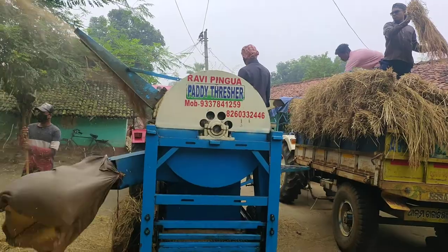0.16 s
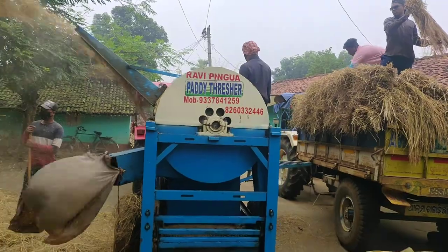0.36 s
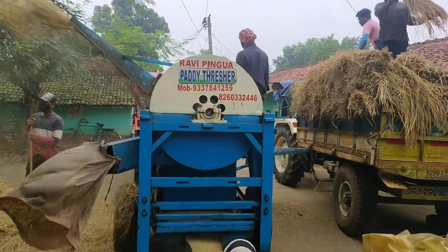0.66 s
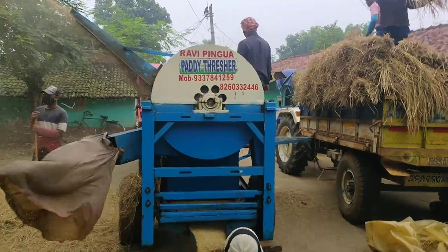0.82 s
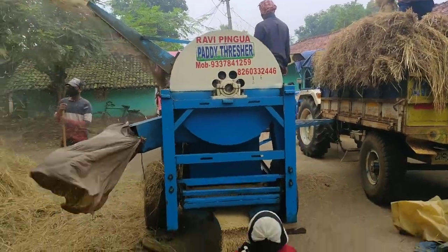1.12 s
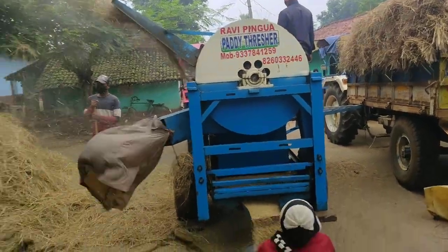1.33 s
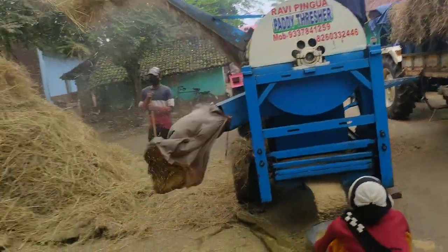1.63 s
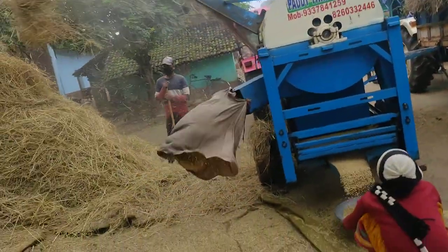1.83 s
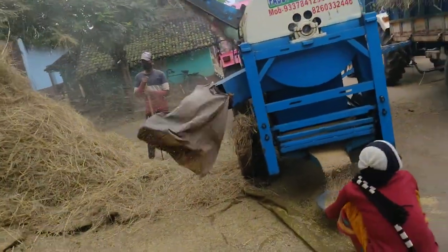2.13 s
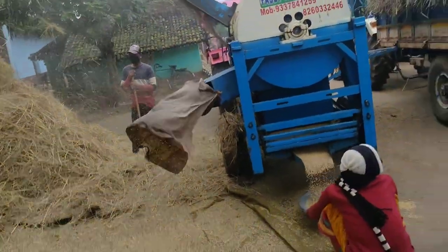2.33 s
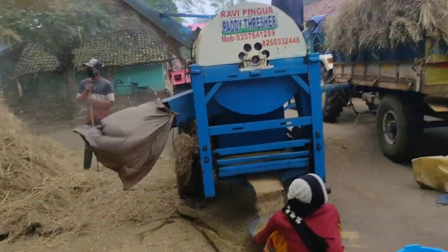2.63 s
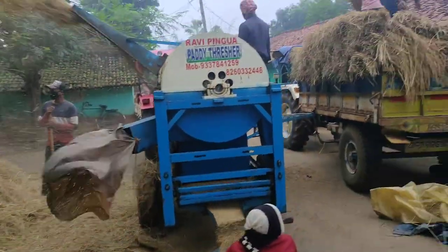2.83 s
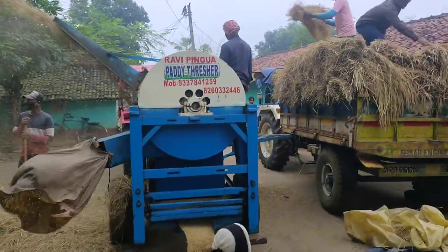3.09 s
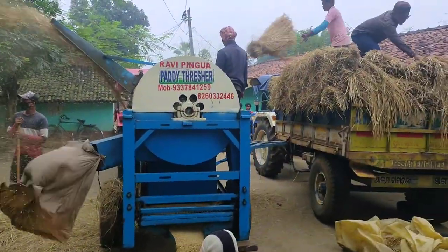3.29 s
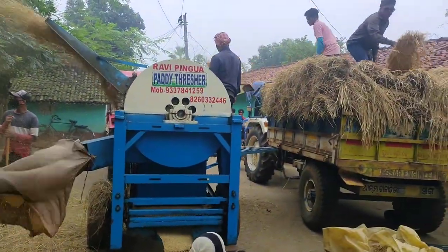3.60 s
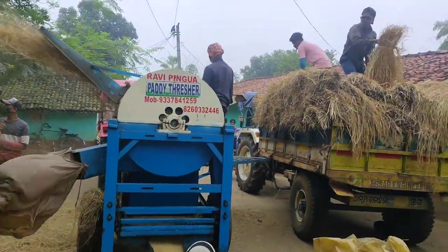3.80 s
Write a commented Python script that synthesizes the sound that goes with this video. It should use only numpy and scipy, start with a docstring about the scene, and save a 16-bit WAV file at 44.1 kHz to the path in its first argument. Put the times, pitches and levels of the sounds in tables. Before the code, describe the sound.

A paddy threshing machine runs steadily, dense straw hiss over low drum booms and dull knocks

```python
"""A dense hiss of straw and grain, its colour always shifting, over booms and knocks: a paddy thresher
runs steadily a few metres away in a village yard. Straw, grain and blower air are shaped noise with
moving levels; wads of straw boom as narrow-band noise and blows knock as short damped tones in the
sheet-metal drum housing; engine and drum shaft hum as harmonics of their turning rates."""
import sys
import numpy as np
from scipy import signal
from scipy.fft import rfft, irfft
from scipy.io import wavfile
from scipy.ndimage import uniform_filter1d

SR = 44100
rng = np.random.default_rng(int(sys.argv[2]) if len(sys.argv) > 2 else 0)


def waveform_to_disk(signal):
    """Save audio, clipped to [-1, 1], as 16-bit WAV at the path in sys.argv[1]."""
    frames = np.transpose(np.atleast_2d(signal))
    scaled = np.clip(frames, -1, 1) * 32767
    samples = np.round(scaled).astype(np.int16)
    wavfile.write(sys.argv[1], SR, samples)


N = 174195
T = np.arange(N) / SR
HOP = 256  # samples


def amp(db):
    """Decibels to gain."""
    return 10 ** (np.asarray(db) / 20)


def unit(x):
    """Scales to rms 1."""
    return x / np.sqrt(np.mean(x ** 2) + 1e-20)


def curve(points, t, column=1):
    """One column of a time table, interpolated at t."""
    p = np.transpose(points)
    return np.interp(t, p[0], p[column])


def read_spectrum(points, hz, column=1):
    """One column of a spectrum table, interpolated on a log-frequency axis."""
    p = np.transpose(points)
    return np.interp(np.log(hz + 1), np.log(p[0] + 1), p[column])


def add(mix, start_s, sound):
    """Mixes a sound in at a time."""
    part = mix[max(round(start_s * SR), 0):][:len(sound)]
    part += sound[:len(part)]


def drift(rate_hz):
    """Low-passed Gaussian noise of rms 1; its spectrum falls to 1/e at rate_hz."""
    f = np.fft.rfftfreq(N, 1 / SR)
    return unit(irfft(rfft(rng.standard_normal(N)) * np.exp(-(f / rate_hz) ** 2), N))


def recolour(x, gain, size=1024):
    """A moving filter, given as a gain of frequency and time."""
    hz, t, z = signal.stft(x, SR, nperseg=size, noverlap=size - HOP)
    return signal.istft(z * gain(hz[:, None], t), SR, nperseg=size, noverlap=size - HOP)[1][:, :N]


# likeness of the two channels: (frequency [Hz], share [0-1])
CHANNEL_LIKENESS = [(100, 0.97), (330, 0.9), (520, 1), (820, 0.72), (1050, 0.48), (1300, 0), (2300, 0.17),
                    (3000, 0.04), (15000, 0.01)]


def turbulence(spectrum, level, patch_db, patch_s, patch_hz, size=1024, shift=((0, 1), (1, 1))):
    """Two-channel turbulent noise: a spectrum, a level curve and random passing patches of colour."""
    frames, hz = N // HOP + 10, np.fft.rfftfreq(size, 1 / SR)
    white = rng.standard_normal((2, frames * HOP))
    a, b = signal.stft(white, nperseg=size, noverlap=size - HOP)[2].transpose(0, 2, 1)

    # patches: random field smoothed over time and frequency
    time_blur = (np.fft.fftfreq(len(a), HOP / SR)[:, None] * patch_s) ** 2
    freq_blur = (np.fft.fftfreq(len(hz), SR / size) * patch_hz) ** 2
    field = np.fft.fft2(rng.standard_normal(a.shape))
    patches = unit(np.fft.ifft2(field * np.exp(-time_blur - freq_blur)).real)

    same = np.clip(read_spectrum(CHANNEL_LIKENESS, hz), 0, 1)
    right_noise = same * a + np.sqrt(1 - same ** 2) * b
    hz = hz / curve(shift, np.arange(len(a)) * HOP / SR)[:, None]  # ratio > 1 moves the spectrum up
    left = a * amp(read_spectrum(spectrum, hz))
    right = right_noise * amp(read_spectrum(spectrum, hz, column=2))
    z = np.array([left, right]) * unit(amp(patch_db * patches))
    noise = signal.istft(z.transpose(0, 2, 1), nperseg=size, noverlap=size - HOP)[1][:, :N]
    return noise * np.sqrt(SR / 2) * amp(curve(level, T))


# hum lines: (multiple of turning rate [-], level [dB], slow waver [dB rms])
ENGINE_LINES = [(1, -55.5, .6), (2, -49, 0.23), (3, -60.5, 1.6)]
SHAFT_LINES = [(1, -59, 1.5), (2, -47.5, 1.8), (3, -59, 3)]
ENGINE_HZ, SHAFT_HZ = 44.23, 33.96
ENGINE_SLIP, SHAFT_SLIP = 0.0027, 0.0047  # rms fraction of speed


def hum(hz, lines, slip):
    """Harmonics of a turning part whose speed slips a little."""
    turns = np.cumsum(hz * (1 + slip * drift(0.72))) / SR
    total = np.zeros(N)
    for multiple, db, waver_db in lines:
        level = np.sqrt(2) * amp(db + waver_db * drift(4.9))
        total += level * np.sin(2 * np.pi * (round(multiple) * turns + rng.random()))
    return total


WHIR_RATE_HZ = 51


def whir(length_s, db, first_hz, last_hz):
    """A narrow band of wind noise that swells, glides and fades."""
    n = round(length_s * SR)
    turn = 2 * np.pi * np.cumsum(np.linspace(first_hz, last_hz, n)) / SR
    noise = drift(WHIR_RATE_HZ)[:n] * np.cos(turn) + drift(WHIR_RATE_HZ)[:n] * np.sin(turn)
    return amp(db) * unit(noise * np.sin(np.linspace(0, np.pi, n)))


# spectra before level: (frequency [Hz], left [dB per Hz], right [dB per Hz])
ROAR_SPECTRUM = [(353, -83, -93), (504, -87.5, -74), (665, -70, -61), (724, -68, -64.5), (884, -66, -70),
                 (1004, -66, -73), (1000, -77, -83.5), (1235, -100, -74), (2520, -120, -120)]
UPPER_ROAR_SPECTRUM = [(854, -94, -101), (995, -65.5, -78), (1134, -70.5, -69.5), (1450, -68.5, -70.5),
                       (1583, -66.5, -71), (1810, -71.5, -78), (2420, -77.5, -79), (3000, -125, -125)]
# gains: (time [s], level [dB])
ROAR_LEVEL_DB = [(0, 5.5), (.2, 7.5), (.33, 0.5), (.48, 7), (.64, -2), (.73, 7), (.86, -2.5), (1.05, -0.5),
                 (1.14, 3), (1.68, 0.5), (1.76, -9.5), (1.82, 8), (1.89, -7.5), (1.96, 3), (2.18, -5),
                 (2.301, 1.5), (2.76, -3), (2.83, 4), (3.25, 2), (3.5, -0.5), (3.78, 0.5), (3.9, 6)]
UPPER_ROAR_LEVEL_DB = [(0, 1), (.2, 1.5), (.55, -1.5), (.75, -3.5), (.95, 0), (1.25, 0), (1.7, -3.5),
                       (1.85, 1.5), (2.15, -1.5), (2.25, 4), (2.45, 5), (2.75, -4), (2.85, 0), (3.05, -4),
                       (3.2, 0.5), (3.35, -2.5), (3.65, -2.5), (3.8, 5), (3.95, 2.5)]
# slide of the roar spectrum: (time [s], frequency ratio [-])
ROAR_SHIFT_RATIO = [(0, 1.106), (.5, 1.12), (1.4, 1.02), (1.8, 0.97), (2.7, 0.91), (3.1, 0.99),
                    (3.95, 0.92)]
# gliding whirs, before pan: (start [s], length [s], level [dB rms], first pitch [Hz], last pitch [Hz])
WHIR_EVENTS = [(.15, 0.083, -33, 839, 870), (1.07, 0.2, -40.5, 750, 795), (1.197, 0.14, -42.5, 860, 954),
               (1.41, 0.097, -46, 1008, 954), (1.52, 0.22, -44, 760, 736), (2.259, 0.15, -41, 529, 590),
               (2.32, 0.16, -43, 1178, 988), (2.54, 0.16, -39.5, 629, 682), (2.8, 0.0715, -39, 871, 750),
               (3.359, 0.057, -46, 730, 723), (3.569, 0.061, -43, 765, 723),
               (3.631, 0.14, -45.5, 860, 1040)]


def blower():
    """Gusty mid-range roar of the fan, with narrow passing whirs."""
    whirs = np.zeros(N)
    for start_s, *event in WHIR_EVENTS:
        add(whirs, start_s, whir(*event))
    roar = turbulence(ROAR_SPECTRUM, ROAR_LEVEL_DB, patch_db=2.5, patch_s=0.051, patch_hz=160,
                      size=2048, shift=ROAR_SHIFT_RATIO)
    upper_roar = turbulence(UPPER_ROAR_SPECTRUM, UPPER_ROAR_LEVEL_DB, patch_db=3.5, patch_s=0.093,
                            patch_hz=168, size=2048)
    return roar + upper_roar + whirs * amp([[-1], [-2]])


WAD_RISE_S, WAD_FALL_S, WAD_HALF_WIDTH_HZ = 0.0044, 0.027, 71.4


def wad(length_s, db, hz):
    """Beaters drag a wad of straw round: the housing booms at an even strength and an unsteady pitch."""
    t = np.arange(0, length_s + WAD_FALL_S, 1 / SR)
    f = np.fft.rfftfreq(N, 1 / SR)
    band = 1 / (1 + ((f - hz) / WAD_HALF_WIDTH_HZ) ** 4)
    boom = signal.hilbert(unit(irfft(rfft(rng.standard_normal(N)) * band, N)))[:len(t)]
    even_boom = boom.real / np.hypot(abs(boom), 1)  # compresses the noise envelope
    envelope = np.clip(np.minimum(t / WAD_RISE_S, (t[-1] - t) / WAD_FALL_S), 0, 1)
    return amp(db) * unit(even_boom) * envelope


KNOCK_RISE_S = 0.0049


def knock(db, hz):
    """One dull blow: the damped housing swings for a few cycles."""
    t = np.arange(0, .06, 1 / SR)
    u = t / KNOCK_RISE_S
    envelope = u ** 2 * np.exp(2 * (1 - u))  # peaks at 1
    return amp(db) * envelope * np.sin(2 * np.pi * (hz * t + rng.random()))


# wads of straw, before envelope and pan: (start [s], length before fall [s], level [dB rms], pitch [Hz])
WAD_EVENTS = [(0.046, 0.051, -25, 246), (0.039, 0.052, -36, 454), (0.128, 0.043, -24.5, 278),
              (0.18, 0.053, -35, 330), (0.225, 0.033, -26, 316), (0.31, 0.054, -29, 258),
              (0.404, 0.061, -34.5, 370), (0.454, 0.14, -34.5, 256), (0.681, 0.034, -31.5, 294),
              (.865, 0.066, -37, 225), (0.886, 0.042, -33.5, 390), (1.019, 0.041, -35, 300),
              (1.498, 0.13, -40.5, 338), (1.739, 0.054, -35.5, 228), (1.863, 0.029, -34.5, 259),
              (2.068, 0.038, -34.5, 270), (2.191, 0.069, -36.5, 335), (2.324, 0.054, -32.5, 270),
              (3.005, 0.11, -34.5, 300), (3.305, 0.024, -36, 330), (3.728, 0.016, -30.5, 245),
              (3.767, 0.044, -28.5, 209)]
# single knocks, before pan: (start [s], envelope peak [dB], pitch [Hz])
KNOCK_EVENTS = [(0.076, -24, 242), (0.497, -22.5, 270), (0.743, -24, 231), (1.043, -25, 272),
                (1.354, -24.5, 295), (1.392, -25, 281), (1.584, -25, 290), (1.603, -30, 290),
                (1.908, -25.5, 304), (2.046, -23.5, 255), (2.063, -22.5, 260), (2.189, -24.5, 289),
                (2.368, -23, 279), (2.871, -29, 290), (3.057, -23, 284), (3.266, -20.5, 240),
                (3.589, -24.5, 243)]
# drum rumble before level: (frequency [Hz], left [dB per Hz], right [dB per Hz])
RUMBLE_SPECTRUM = [(22, -95, -90), (34, -91, -84), (74.4, -74, -73), (119, -87, -91), (171.5, -74, -77),
                   (204, -64, -63), (232, -71, -75), (307, -60, -60.5), (412, -72, -77), (458, -83.5, -87),
                   (710, -104, -100), (1500, -125, -125)]
# rumble gain: (time [s], level [dB])
RUMBLE_LEVEL_DB = [(0, 7.5), (.3, 6.5), (.7, 7.5), (1.2, 0), (1.45, 3.5), (1.7, 0.5), (2.25, 4), (2.5, -1),
                   (2.85, 3.5), (3.2, 0), (3.5, 1.5), (3.95, 6.5)]


def drum():
    """Low rumble of the drum, with wads and knocks in its housing slightly to the left."""
    blows = np.zeros(N)
    for start_s, *event in WAD_EVENTS:
        add(blows, start_s, wad(*event))
    for start_s, *event in KNOCK_EVENTS:
        add(blows, start_s, knock(*event))
    rumble = turbulence(RUMBLE_SPECTRUM, RUMBLE_LEVEL_DB, patch_db=4.0, patch_s=0.023, patch_hz=151,
                        size=2048)
    return blows * amp([[.3], [-1.5]]) + rumble


# lower edge of the straw rush, which thins as it rises: (time [s], edge [Hz])
RUSH_EDGE_HZ = [(0, 1100), (.85, 1150), (1.1, 1400), (1.19, 2080), (1.5, 1990), (1.85, 1460), (2.3, 1760),
                (2.5, 1510), (3.45, 1600), (3.8, 1240)]


def rush_edge(hz, t):
    """Sixth-order high-pass with a moving corner."""
    return 1 / np.sqrt(1 + (curve(RUSH_EDGE_HZ, t) / (hz + 1)) ** 12)


# straw rush, grain hiss, grain outlet, before level: (frequency [Hz], left [dB per Hz], right [dB per Hz])
RUSH_SPECTRUM = [(930, -125, -85), (1380, -73.5, -95), (1857, -67.5, -68), (2250, -62.5, -71),
                 (3000, -63.5, -72.5), (3640, -68, -93.5), (3880, -72, -67.5), (4150, -97, -79.5),
                 (5000, -110, -110)]
HISS_SPECTRUM = [(3800, -110, -110), (4000, -67, -73), (4130, -67.5, -80), (5040, -69, -71),
                 (6200, -62.5, -68), (7140, -64.5, -63), (8010, -69.5, -59.5), (9390, -67.5, -67),
                 (9570, -69, -68.5), (12300, -67, -73.5), (14100, -67.5, -70), (15800, -66, -81)]
OUTLET_SPECTRUM = [(4100, -120, -120), (4310, -74.5, -77), (5150, -62, -80), (6100, -60, -76),
                   (7140, -82, -90), (9000, -110, -110)]
# their gains: (time [s], level [dB])
RUSH_LEVEL_DB = [(0, 3.5), (.5, 3), (.9, 2.5), (1.25, 0), (1.65, -1), (1.9, 0), (2.1, -1.5), (2.35, -0.5),
                 (2.7, 0), (3.1, 1), (3.5, 0), (3.75, -1), (3.95, 2.5)]
HISS_LEVEL_DB = [(0, 2.1), (.45, 0.71), (.85, 1.7), (1.25, 0.16), (1.72, -1.6), (1.87, 0.88), (2.15, -0.66),
                 (2.75, 0.27), (3.15, 1.6), (3.5, -0.67), (3.95, -0.032)]
OUTLET_LEVEL_DB = [(0, -16), (1.7, -5), (1.95, -0.5), (2.55, -1), (3.95, -8)]


def crop():
    """Straw rushes through, grain hisses over the sieves and pours from the outlet: shaped noise."""
    rush = turbulence(RUSH_SPECTRUM, RUSH_LEVEL_DB, patch_db=2.5, patch_s=0.042, patch_hz=108)
    hiss = turbulence(HISS_SPECTRUM, HISS_LEVEL_DB, patch_db=2.5, patch_s=0.037, patch_hz=108)
    outlet = turbulence(OUTLET_SPECTRUM, OUTLET_LEVEL_DB, patch_db=2.5, patch_s=0.061, patch_hz=110)
    return recolour(rush, rush_edge) + hiss + outlet


# midrange hollow, a bump where negative: (time [s], centre [Hz], depth [dB])
MID_HOLLOW_PATH = [(0, 1420, 5.5), (.95, 1350, 1), (1.1, 1270, 9), (1.48, 1250, 13), (1.7, 1590, 4),
                   (1.85, 1510, 1), (2.1, 1430, 17), (2.25, 1420, 2), (2.52, 1350, 25), (2.62, 990, 4),
                   (2.78, 960, 5.5), (2.82, 1220, -5), (3.6, 1230, 8)]
# treble hollow: (time [s], depth [dB])
TREBLE_DEPTH_DB = [(0, 17), (.3, 20), (.5, 12), (.7, 26), (1.1, 26), (1.58, 9), (1.73, 24), (1.92, 8),
                   (2.1, 16), (2.62, 2), (2.8, 18), (3.2, 19), (3.5, 36), (3.8, 14)]
MID_WIDTH_HZ = 113
TREBLE_HZ, TREBLE_WIDTH_HZ, TREBLE_WANDER_HZ = 4221, 215, 57  # wander is rms


def hollows(hz, t):
    """Two hollows in the noise wander, deepen and fill again."""
    mid_hz = curve(MID_HOLLOW_PATH, t)
    mid_db = curve(MID_HOLLOW_PATH, t, column=2) * np.exp(-((hz - mid_hz) / MID_WIDTH_HZ) ** 2)
    treble_hz = TREBLE_HZ + TREBLE_WANDER_HZ * np.interp(t, T, drift(9.7))
    treble_db = curve(TREBLE_DEPTH_DB, t) * np.exp(-((hz - treble_hz) / TREBLE_WIDTH_HZ) ** 4)
    return amp(-mid_db - treble_db)


def scene():
    """The whole machine."""
    hums = hum(ENGINE_HZ, ENGINE_LINES, ENGINE_SLIP) + hum(SHAFT_HZ, SHAFT_LINES, SHAFT_SLIP)
    return hums + drum() + recolour(blower() + crop(), hollows)


# suppressor threshold: (frequency [Hz], level [dB per Hz])
GATE_THRESHOLD = [(200, -100), (500, -80), (1300, -72.5), (2000, -71), (3500, -84), (4300, -72.5),
                  (6000, -78.5), (12000, -79)]
GATE_DEPTH_DB, GATE_KNEE_DB = 20, 4


def suppress(x, size=1024, order=7):
    """Noise suppressor: turns down every narrow band that stays weak, which hollows the valleys."""
    overlap = size - size // 4
    hz, _, z = signal.stft(x, SR, nperseg=size, noverlap=overlap, scaling="psd")
    power = uniform_filter1d(2 * abs(z) ** 2, size=order, axis=2)  # over time
    power = uniform_filter1d(power, size=3, axis=1)  # over frequency
    over_db = 10 * np.log10(abs(power) + 1e-20) - read_spectrum(GATE_THRESHOLD, hz)[:, None]
    shut = .5 - .5 * np.tanh(over_db / (2 * GATE_KNEE_DB))
    gated = z * amp(-GATE_DEPTH_DB * shut)
    return signal.istft(gated, SR, nperseg=size, noverlap=overlap, scaling="psd")[1][:, :N]


EDGE_HZ = 15850


def record(dry):
    """Noise suppressor, then a steep low-pass."""
    lowpass = signal.firwin(1023, EDGE_HZ, window=("kaiser", 9), fs=SR)
    return signal.oaconvolve(suppress(dry), lowpass[None], "same")


dry = scene()
out = record(dry)
waveform_to_disk(out)
```